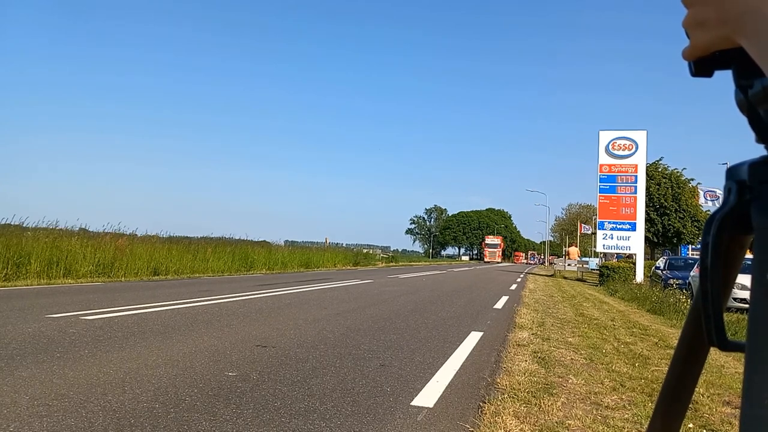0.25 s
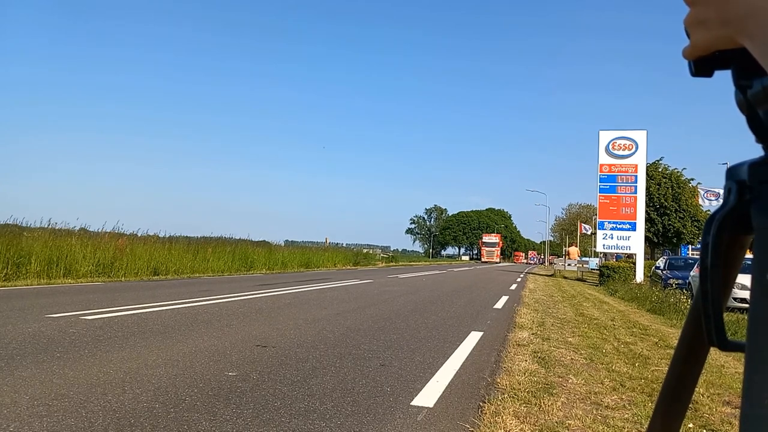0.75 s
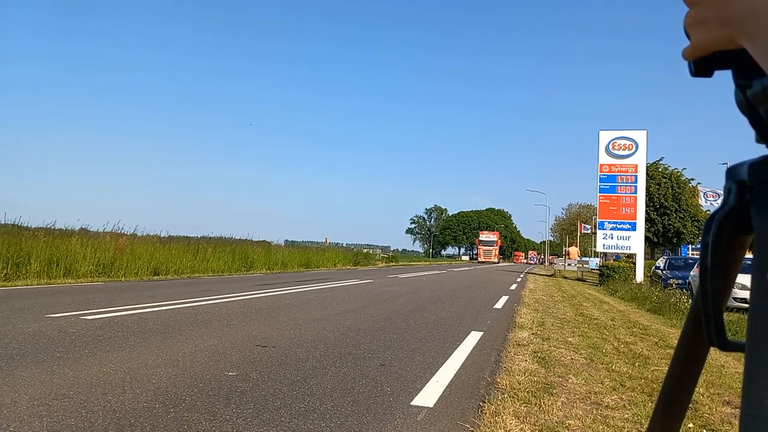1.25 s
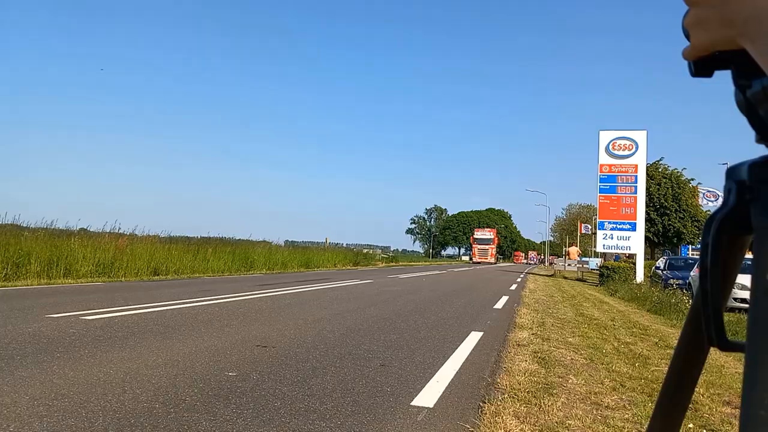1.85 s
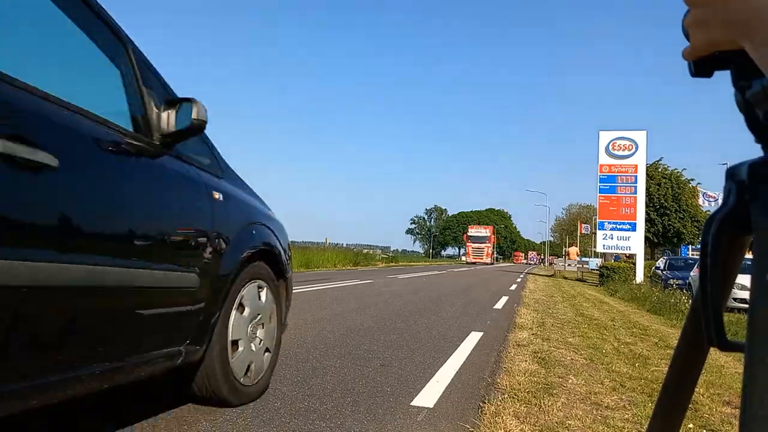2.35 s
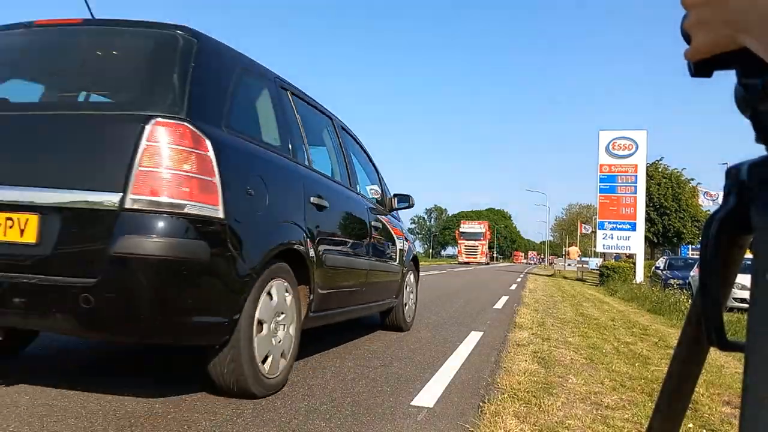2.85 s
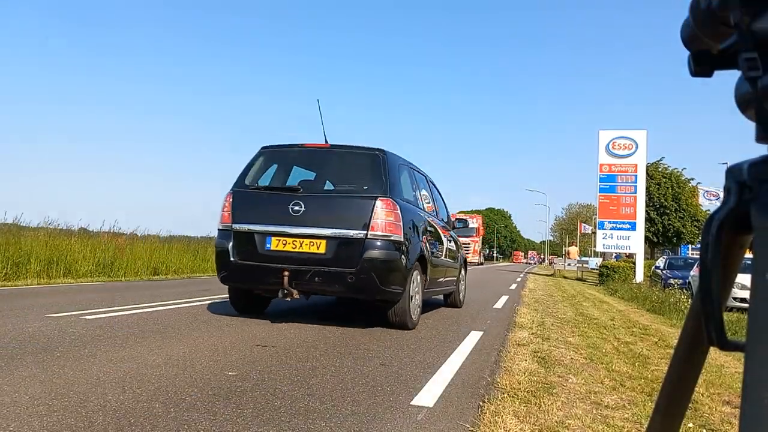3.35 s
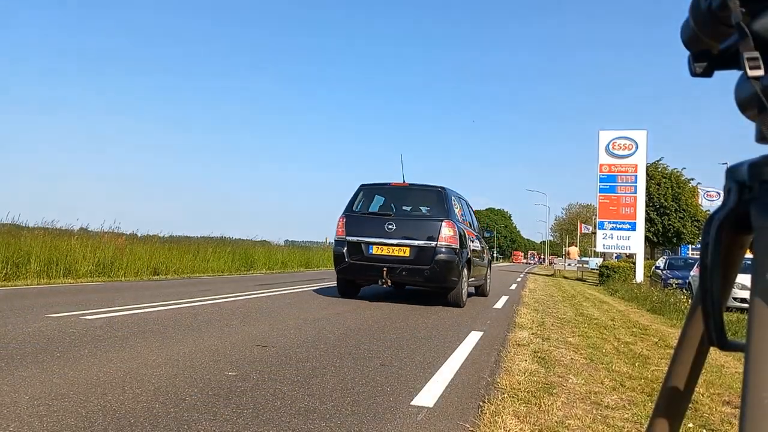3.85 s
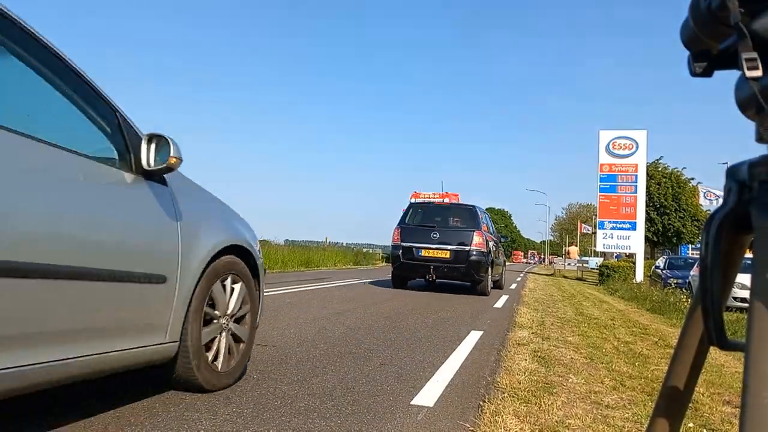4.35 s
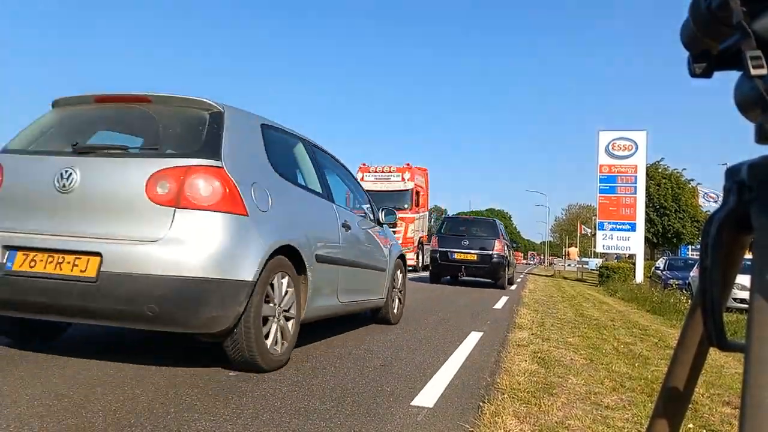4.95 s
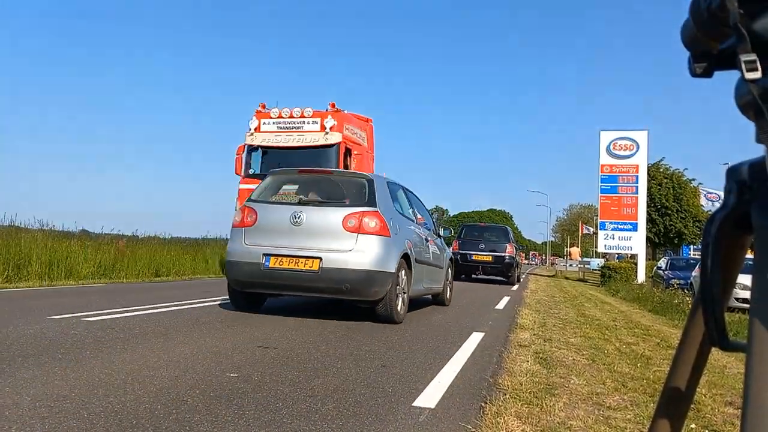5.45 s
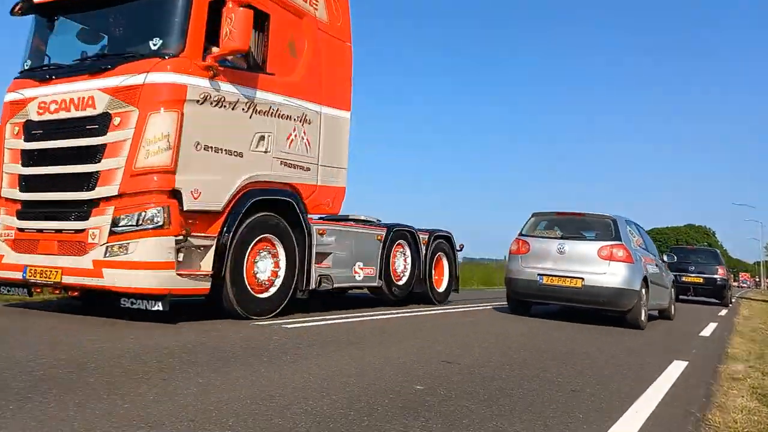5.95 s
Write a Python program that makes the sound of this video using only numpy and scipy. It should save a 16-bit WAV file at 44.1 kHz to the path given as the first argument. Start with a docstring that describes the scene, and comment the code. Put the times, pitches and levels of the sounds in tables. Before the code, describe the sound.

A truck's deep twin air horn blares from afar, cars brush past close, then it blips and blares again nearer before the diesel roars up.

```python
"""Twin air trumpets on an oncoming truck, from a country roadside: a long blast far off, a blip, a long blast nearer.
Each trumpet is a sum of harmonics, its pulses sliding through those of its twin; echoes and hiss are added.
Two cars roll past close by, in filtered noise and wavering tones; the later blast comes partly from behind them.
Then the truck's diesel (sine orders) and tyres (noise) swell as it draws level.
Gusts thump on the microphone ports, as short bursts of low noise over a faint breeze."""
import sys
import numpy as np
from scipy import signal
from scipy.fft import rfft, irfft
from scipy.io import wavfile
from scipy.ndimage import uniform_filter1d, map_coordinates

SR = 44100
rng = np.random.default_rng(int(sys.argv[2]) if len(sys.argv) > 2 else 0)


def to_wav(s):
    """Save 16-bit WAV."""
    ch = np.atleast_2d(s).T  # columns
    pcm = np.round(np.clip(ch, -1, 1) * 32767)  # PCM
    wavfile.write(sys.argv[1], SR, pcm.astype(np.int16))


N = 272920
TIME = np.arange(N) / SR
BINS = np.maximum(np.arange(N // 2 + 1) * SR / N, 1)   # Hz
CUTOFF_HZ = 15800   # top of the horn's harmonics and of the microphone channel
CLEARS_S = (4.056, 4.34)   # the truck comes out from behind the first car

# pulls on the horn valve, the second a mere blip: [opens t/s, shuts t/s, pitch f/Hz,
# trumpets in step t/s, punch level/dB before its share per band, bell note f/Hz, attack t/s]
BLASTS = [(-.1997, 1.056, 129.6, .245, 0, 830, .035), (3.5148, 3.563, 131, 3.63, 7, 790, .024),
          (3.6062, 4.583, 130.45, 3.685, 0, 730, .047)]
# horn colour from behind the first car: [f/Hz, relative level/dB]
HORN_SCREENED = [(130, 15), (260, 6.5), (390, 9), (520, -11), (650, -3.5), (790, -5), (1040, -3),
                 (1300, -3), (1650, -5.5), (2200, -5), (2800, -6), (3550, -7.5), (4100, -14.5),
                 (5800, -11.5), (7000, -15), (8800, -32), (15000, -39.5)]
# cars going by: [nearest t/s, rumble level/dB, roar level/dB]
CARS = [(2.7, -34, -33), (4.5, -45, -66)]
# colour of the cars' road noise: [f/Hz, relative level/dB per Hz]
CAR_COLOUR = [(30, -36), (55, -24), (70, -5.5), (135, -3), (185, -10), (235, -5.5), (310, -9.5),
              (420, -11.5), (600, -7), (850, -12), (1150, -12), (2100, -21.5), (3100, -28.5), (3900, -31),
              (7200, -35), (8400, -47.5), (13500, -43.5), (15500, -46)]


def horn():
    """The blasts, fraying in the air, glancing off the traffic and returning dully from trees and buildings."""
    blocks_s = (3.71, 3.89)   # the first car moves across the truck
    distant, *rest = [blast(*row) for row in BLASTS]
    close = sum(rest)
    direct = distant + close
    hiss = rasp(distant, above_hz=4200, blur_hz=300, level_db=-5.5)
    hiss = hiss + rasp(close, above_hz=3700, blur_hz=300, level_db=-9)
    near = glints(direct, above_hz=2600, latest_s=.0035, sway_s=.00004, sway_hz=2.5, level_db=-5.5)
    # while the first car stands in the way, the sound also bounces round it by longer paths
    blocked = fade(TIME, *blocks_s) * (1 - fade(TIME, *CLEARS_S))
    detour = glints(close * blocked, above_hz=1000, latest_s=.0075, sway_s=.00005, sway_hz=2, level_db=-5)
    # the shortest waves also scatter off the road and the verge
    shortest = irfft(rfft(close) * (1 - below(BINS, 8000) ** 2), N)
    sparkle = scatter(shortest, t60=.02, dull_hz=16000, level_db=-1)
    # long waves pass through the trees and short ones die in the leaves
    returned = signal.sosfilt(signal.butter(1, [420, 1100], "band", fs=SR, output="sos"), direct)
    echo = scatter(returned, t60=0.34, dull_hz=2110, level_db=-5.0)
    return direct + ring_out() + leak() + rush(direct) + hiss + near + detour + sparkle + echo


def blast(opens, shuts, pitch_hz, in_step_s, punch_db, bell_hz, attack_s, size=16):
    """Two reeds chop the air into pulses; the second runs slightly faster and slides through the first."""
    # horn paths far off, behind the first car, near: [second trumpet's treble level/dB, left lag t/ms]
    horn_paths = [(-19.5, 0.088), (-6, 0.074), (-15.5, 0.025)]
    release_s = 0.066   # the air pressure drains
    rise_hz_per_s, sag_hz = .55, 3.6   # pitch creeps up, and sags without pressure
    overshoot_hz, settle_s = 2, .04   # it starts sharp
    beat_hz = 1.64   # the second trumpet runs this much faster
    jitter, slack_jitter = 0.0012, 0.047   # cycles: at full pressure, and added as it drops

    on = (TIME >= opens) & (TIME <= shuts + release_s)
    t = TIME[on]
    # slack is 0 at full pressure, 1 at none
    slack = 1 - fade(t, opens, opens + attack_s) * fade(t, shuts + release_s, shuts)
    pitch = pitch_hz + rise_hz_per_s * (t - opens) - sag_hz * slack
    pitch = pitch + overshoot_hz * np.exp(-(t - opens) / settle_s)

    close, clear = int(opens > CARS[0][0]), fade(t, *CLEARS_S)
    path = np.array([(1 - close) * (1 - clear), close * (1 - clear), clear])
    second_db, lag_ms = np.transpose(horn_paths) @ path
    hz = np.arange(1, CUTOFF_HZ // pitch_hz)[:, None] * pitch.mean()
    # the second trumpet points away, which costs it more treble than bass
    weaker = from_db(second_db[::size] * (1 - 0.84 * below(hz, 1810, order=2)))
    # the weights move slowly, so one per block of samples will do
    weights = harmonic_weights(t[::size], slack[::size], punch_db, bell_hz, path[:, ::size], hz)
    weights = weights / np.sqrt(1 + weaker ** 2)

    sound = 0
    for offset, strengths in ((0, weights), (beat_hz * (t - in_step_s), weights * weaker)):
        wobble = (jitter + slack_jitter * slack) * drift(57)[on]
        cycle = np.exp(2j * np.pi * (np.cumsum(pitch) / SR + offset + wobble))
        harmonic = 1
        for strength in strengths:
            harmonic = harmonic * cycle   # next power: next harmonic
            sound = sound + (np.repeat(strength, size)[:len(t)] * harmonic).real
    out = np.zeros((2, N))
    late = map_coordinates(sound, [np.arange(len(t)) - lag_ms * SR / 1000], order=3)
    out[:, on] = from_db(0.92) * late, sound
    return out


def harmonic_weights(t, slack, punch_db, bell_hz, path, hz):
    """Strength of each harmonic: the colour of its path, the level of its band, softened as pressure drops."""
    # horn colour far off, then near: [f/Hz, relative level/dB]
    far_colour = [(130, 5), (260, 3.5), (390, 6), (520, -7), (780, -1.5), (910, 4.5), (1040, 3.5),
                  (1170, 3.5), (1430, -5), (1600, -2), (1800, -5.5), (1950, -14), (2300, -6.5), (2500, -15),
                  (3100, -3), (3300, -6.5), (3650, 2), (3850, -6), (4200, -23), (5600, -20.5), (7200, -28),
                  (8800, -44.5), (15000, -60)]
    near_colour = [(130, 8.5), (260, 0.5), (390, 0.5), (520, 0), (650, 5), (800, 4), (1100, 14.5),
                   (1550, 15), (1800, 10), (1960, 12.5), (2300, 3.5), (2600, 6.5), (2900, 2), (3350, 11.5),
                   (3700, 1.5), (4300, -15), (5100, -15), (5700, -10.5), (6400, -20), (7300, -16),
                   (8800, -33), (15000, -32)]
    # the horn as it arrives, before the lift: [t/s, blare level/dB, bite level/dB, sizzle level/dB]
    reach_far = [(0.03, -24, -31, -38.5), (0.182, -24, -32.5, -40.5), (0.55, -25, -31, -39.5),
                 (0.82, -25, -28.5, -40), (1.03, -25.5, -30.5, -36)]
    reach_close = [(3.68, -25, -22, -24.5), (3.878, -27.5, -26, -33), (4.012, -24.5, -27.5, -31.5),
                   (4.1, -24, -27.5, -27), (4.212, -20.5, -24.5, -34), (4.418, -25, -23.5, -24.5),
                   (4.494, -21.5, -27.5, -27.5), (4.58, -22, -19, -26.5)]
    # lift, a row for far and one for close: [blare level/dB, bite level/dB, sizzle level/dB]
    band_lift = [(-0.77, 2.5, 5.2), (0.39, 0.29, 2.6)]
    # share of a pull's punch: [bass, blare, bite, sizzle]
    punch_share = (0.14, 0.9, 0.57, 0.15)
    bass_db = (-30, -28.5)   # lowest harmonics, far and close
    # moving air makes blare, bite and sizzle flicker, but not the bass
    twinkle_db, twinkle_hz = (0, .3, .5, 1.7), 30
    # as the pressure drops the bell's note stands out and sinks, and the treble goes
    bell_fall_hz, bell_width_hz, bell_db, slack_dull_db = 256, 150, 12, 12

    colours = (far_colour, HORN_SCREENED, near_colour)
    weights = sum(pulse_shape(colour, hz) * share for colour, share in zip(colours, path))
    weights = weights * glides(t, hz)
    close = int(path[0, 0] == 0)
    reach = in_time((reach_far, reach_close)[close], t)
    levels = [bass_db[close]] + [db + lift for db, lift in zip(reach, band_lift[close])]
    # bands are levelled between edges and cross over between knees (Hz)
    edges, knees = (0, 600, 1900, 4100, SR), (450, 750, 1500, 2400, 3700, 4600)
    gain = 0
    for k, db in enumerate(levels):
        inside = (hz[:, 0] >= edges[k]) & (hz[:, 0] < edges[k + 1])
        band_rms = np.sqrt(np.sum(abs(weights[inside]) ** 2, axis=0) / 2)
        share = np.interp(hz, knees, (np.arange(len(knees)) + 1) // 2 == k)
        twinkle = twinkle_db[k] * np.interp(t, TIME, drift(twinkle_hz))
        gain = gain + share * from_db(db + twinkle + punch_db * punch_share[k]) / band_rms
    bell = np.exp(-((hz - bell_hz + bell_fall_hz * slack) / bell_width_hz) ** 2)
    bell = np.minimum(2 * slack, 1) * bell
    dulling_db = slack_dull_db * slack * np.log(1 + hz / 2000)
    return weights * gain * (1 - slack) * from_db(bell_db * bell - dulling_db)


def pulse_shape(colour, hz, spread_hz=1100):
    """Complex harmonic weights of a pulse with this colour: minimum phase, so all its ringing follows the front."""
    grid = np.linspace(1, SR / 2, 2049)
    cepstrum = irfft(np.log(from_db(at_hz(colour, grid))))
    cepstrum[len(grid):] = 0   # keep the causal half
    angle = np.interp(hz, grid, 2 * rfft(cepstrum).imag)
    angle += np.pi - 2 * np.arctan(hz / spread_hz)   # long waves leave the flare late
    return from_db(at_hz(colour, hz)) * np.exp(1j * angle)


def glides(t, hz):
    """Bands that ring out or cancel, sliding as the trumpets speak and the cars shift across the path."""
    # [from t/s, to t/s, from f/Hz, to f/Hz, width f/Hz, level/dB (negative cancels)]
    sliding_bands = [(3.534, 3.552, 1060, 1160, 170, 9), (3.61, 3.657, 760, 950, 220, 4),
                     (3.557, 3.98, 2440, 2100, 400, 6), (3.696, 3.97, 3580, 3670, 130, 8.5),
                     (3.713, 3.98, 3280, 2580, 350, -7.5), (4.113, 4.56, 1290, 1550, 275, 4),
                     (4.15, 4.58, 3140, 3400, 250, 0.5)]
    fade_s = 0.045
    response = 1
    for start, end, from_hz, to_hz, width_hz, db in sliding_bands:
        centre = from_hz + (to_hz - from_hz) * fade(t, start, end)
        present = fade(t, start - fade_s, start) * fade(t, end + fade_s, end)
        peak = 1 + (from_db(abs(db) * present) - 1) / (1 + 2j * (hz - centre) / width_hz)
        response = response * peak ** np.sign(db)
    return response


def ring_out():
    """Each time the valve shuts, the tubes ring on briefly with their own low notes."""
    # notes of the tubes: [f/Hz, level/dB far, level/dB close]
    tube_modes = [(520, -39, -26.5), (647, -24, -21.5), (769, -26, -26)]
    late_s, swell_s, t60_s = .012, 0.012, 0.16
    out = 0
    for opens, shuts, *_ in BLASTS:
        close = int(opens > CARS[0][0])
        t = np.maximum(TIME - shuts - late_s, 0)
        envelope = fade(t, 0, swell_s) * from_db(-60 * np.clip((t - swell_s) / t60_s, 0, 2))
        for hz, *db in tube_modes:
            out = out + from_db(db[close]) * envelope * np.sin(2 * np.pi * (hz * t + rng.random()))
    return out


def leak(stop_s=0.12):
    """Air hisses through the trumpets: it swells up to the start of the blip, then dies as the reeds catch."""
    peak_s, peak_db, rise_db_per_s, low_hz = 3.52, -31, 146, 1800
    air = irfft(stereo_noise(HORN_SCREENED, left_lead_ms=0.083) * (1 - below(BINS, low_hz) ** 2), N)
    swell = from_db(peak_db - rise_db_per_s * np.clip(peak_s - TIME, 0, 1))
    return swell * fade(TIME, peak_s + stop_s, peak_s) * rms_one(air)


def rush(x):
    """Air rushing through the reeds: noise that follows the strength of the horn in the right channel."""
    level_db, low_hz, top_hz = -11.5, 478, 17000   # level against the tone
    strength = np.sqrt(np.maximum(uniform_filter1d(x[1] ** 2, size=SR // 130), 0))
    band = below(BINS, top_hz) * (1 - below(BINS, low_hz) ** 2)
    air = irfft(stereo_noise(HORN_SCREENED, left_lead_ms=0.08) * band, N)
    return from_db(level_db) * strength * rms_one(air)


def rasp(x, above_hz, blur_hz, level_db):
    """Turbulent air frays the upper harmonics into hiss, differently in each channel."""
    bright = signal.sosfilt(signal.butter(4, above_hz, "high", fs=SR, output="sos"), x)
    eddies = rms_one(irfft(rfft(rng.standard_normal((2, N))) * below(BINS, blur_hz, order=2), N))
    return scatter(bright * eddies, t60=.012, dull_hz=12000, level_db=level_db)


def glints(x, above_hz, latest_s, sway_s, sway_hz, level_db, count=5):
    """Short reflections off moving car bodies: their paths keep changing, which blurs the upper partials."""
    bright = signal.sosfilt(signal.butter(1, above_hz, "high", fs=SR, output="sos"), x)
    out = np.zeros((2, N))
    for side in range(2):
        for k in range(count):
            path_s = latest_s * ((k + 1 + rng.random()) / (count + 1)) ** 2
            delay = path_s + sway_s * drift(sway_hz)
            out[side] += (-1) ** k * np.interp(TIME - delay, TIME, bright[side])
    return from_db(level_db) * out / np.sqrt(count)


def scatter(x, t60, dull_hz, level_db):
    """Many weak reflections, different in each channel, dying away; the level is before dulling."""
    tail = rng.standard_normal((2, N)) * from_db(-60 * np.minimum(TIME / t60, 5))
    tail /= np.sqrt(np.sum(tail ** 2, axis=1, keepdims=True))
    tail = irfft(rfft(tail) * below(BINS, dull_hz, order=1), N)[:, :SR]
    return from_db(level_db) * signal.fftconvolve(x, tail, axes=1)[:, :N]


def cars():
    """Two cars roll by on the left in road noise; the first hums, whines, flicks grit and squeals faintly."""
    # the cars' tyre hiss: [t/s, level/dB]
    tyre_hiss = [(1.15, -54), (1.7, -49), (2.3, -46.5), (2.9, -45.5), (3.2, -44.5), (3.45, -42.5),
                 (4.7, -51), (5, -53), (5.3, -59)]
    pass_s = 0.6   # distance from the lane over speed
    after_db_per_s = 1   # lift once a car has gone by, so it fades less than distance alone would make it
    power = 0
    for s, *levels in CARS:
        lift_db = after_db_per_s * np.maximum(TIME - s, 0)
        gains = np.array([from_db(db + lift_db) * passing(s, pass_s) for db in levels])
        power = power + gains ** 2
    gains = [*np.sqrt(power), from_db(in_time(tyre_hiss)[0])]
    tyres = road_noise(gains, CAR_COLOUR, left_lead_ms=0.29, flutter_db=3.5)
    # the first car's tailpipe points at the microphone
    exhaust = passing_tone(peak_s=3.35, width_s=0.089, peak_hz=140.6, fall_hz_per_s=16, level_db=-27.5,
                           waver=0.024, waver_hz=25.2, reach_s=0.32)
    # its tyres sing
    whine = passing_tone(peak_s=3, width_s=0.6, peak_hz=2620, fall_hz_per_s=90, level_db=-52,
                         waver=0.062, waver_hz=203, reach_s=0.41)
    return tyres + exhaust + squeal() + grit() + whine * from_db(4.5 * drift(28.0))


def passing_tone(peak_s, width_s, peak_hz, fall_hz_per_s, level_db, waver, waver_hz, reach_s):
    """An unsteady line that swells, fades and sinks in pitch as its car goes by."""
    hz = (peak_hz - fall_hz_per_s * (TIME - peak_s)) * (1 + waver * drift(waver_hz))
    gain = from_db(level_db) * passing(peak_s, width_s) * below(abs(TIME - peak_s), reach_s)
    return gain * np.sqrt(2) * np.sin(2 * np.pi * np.cumsum(hz) / SR)


def squeal(waver=0.0063, waver_hz=150, flicker_db=3):
    """A thin brake squeal, one wavering sine that sinks in pitch as the first car goes by."""
    # its course: [t/s, f/Hz, level/dB]
    squeal_line = [(.9, 6850, -90), (1.2, 6820, -69), (1.76, 6670, -53.5), (1.95, 6430, -60),
                   (2.26, 6370, -55), (2.6, 6280, -60), (3.3, 6200, -90)]
    hz, db = in_time(squeal_line)
    angle = 2 * np.pi * np.cumsum(hz * (1 + waver * drift(waver_hz))) / SR
    return from_db(db + flicker_db * drift(26)) * np.sqrt(2) * np.sin(angle)


def grit(decay_s=0.0038, low_hz=600, top_hz=2600):
    """The first car's tyres flick loose chippings: short dull ticks of decaying noise."""
    # each tick: [t/s, level/dB]
    chippings = [(2.036, -31), (2.254, -34), (2.402, -35), (2.612, -28), (2.879, -26), (3.096, -31)]
    envelope = 0
    for s, db in chippings:
        decay = np.exp(-np.clip((TIME - s) / decay_s, 0, 30))
        envelope = envelope + from_db(db) * (TIME >= s) * decay
    band = below(BINS, top_hz, order=2) * (1 - below(BINS, low_hz) ** 2)
    return envelope * rms_one(irfft(stereo_noise(CAR_COLOUR, left_lead_ms=0.32) * band, N))


def truck(rough=0.53, clatter=0.06):
    """Exhaust orders carry from afar; gear whine and tyre roar, throbbing with the firings, emerge later."""
    # colour of its road noise: [f/Hz, relative level/dB per Hz]
    truck_colour = [(18, -59), (30, -61), (58, -10), (88, 7.5), (126, 0), (180, -4), (219, -9), (256, -13),
                    (410, -27), (622, -19), (760, -23), (1050, -23.5), (2240, -32.5), (4200, -38.5),
                    (5200, -39), (7080, -43), (9190, -58), (12500, -52), (15500, -57)]
    # exhaust orders and gear whine, before distance and approach:
    # [multiple of the firing rate, level/dB, loss/dB behind the car (negative: louder there)]
    diesel_orders = [(1, -19.5, 8), (2, -41.5, -5.5), (3, -31, 7), (4, -32, -2), (5.33, -31, 21),
                     (7.29, -28, 16), (8.88, -36, 26), (10.27, -37, 14)]
    # [nearest t/s, then before distance and approach: rumble level/dB, roar level/dB, hiss level/dB]
    truck_pass = (6, -25, -20, -34.5)
    # the second car hides the truck until it emerges, costing rumble, roar and hiss this much
    emerges_s, screen_db = (5.56, 5.92), (11.5, 11, 13)
    tyre_pass_s, engine_pass_s = 0.31, 0.31   # distance over speed
    engine_late_s = 0.07   # the exhaust passes after the front wheels
    firing_hz, rev_hz_per_s = 84.7, 4.5   # as the truck draws level, and its acceleration

    nearest_s, *levels = truck_pass
    near, hidden = passing(nearest_s, tyre_pass_s), 1 - fade(TIME, *emerges_s)
    rate_hz = (firing_hz + rev_hz_per_s * (TIME - nearest_s)) * (1 + 0.0056 * drift(9.3))
    angle = 2 * np.pi * np.cumsum(rate_hz) / SR
    engine = 0
    for k, db, loss in diesel_orders:
        unsteady = 1 + rough * min(k / 2.5, 1) * drift(32)
        engine = engine + from_db(db - loss * hidden) * np.sqrt(2) * unsteady * np.sin(k * angle)
    gains = [from_db(db - loss * hidden) for db, loss in zip(levels, screen_db)]
    roar = road_noise(gains, truck_colour, left_lead_ms=0.028, flutter_db=2.5)
    approach = fade(TIME, 1.4, 6.9)   # still rising at the end
    exhaust = passing(nearest_s + engine_late_s, engine_pass_s) * engine
    return approach * (exhaust + near * roar * (1 + clatter * np.cos(angle)))


def gusts(width_s=0.007, low_hz=70, top_hz=160):
    """Eddies thump on the microphone ports: a few strong ones among lesser ones at random."""
    # the strongest: [t/s, peak level/dB before the 6 dB cut below]
    strong_gusts = [(1.8, -24), (2.084, -26), (2.321, -22), (2.395, -18), (2.53, -19), (2.58, -19),
                    (3.038, -12), (3.4, -16.5), (5.475, -14.5)]
    # lesser ones in the wake of the cars; levels before the same cut
    eddies_per_s, eddy_db, eddy_spread_db, span_s = 4, -23.5, 2.5, (0.74, 5.8)
    eddies = list(strong_gusts)
    for when, strength in rng.random((int(eddies_per_s * np.ptp(span_s)), 2)):
        db = eddy_db + eddy_spread_db * (2 * strength - 1)
        eddies.append((np.interp(when, (0, 1), span_s), db))
    power = 0
    for s, db in eddies:
        power = power + from_db(2 * db) * np.exp(-np.minimum(((TIME - s) / width_s) ** 2, 20))
    shared, left, right = rng.standard_normal((3, N))
    band = below(BINS, top_hz, order=3) * (1 - below(BINS, low_hz, order=2) ** 2)
    air = irfft(rfft(shared + 0.66 * np.array([left, right])) * band, N)
    return from_db(-6.0) * np.sqrt(power) * rms_one(air)


def breeze():
    """A light rumble of moving air on the microphone ports, different at each."""
    level_db, low_hz, top_hz = -41.5, 73, 98
    band = below(BINS, top_hz, order=3) * (1 - below(BINS, low_hz, order=2) ** 2)
    air = irfft(rfft(rng.standard_normal((2, N))) * band, N)
    return from_db(level_db + 1.4 * drift(13)) * rms_one(air)


def road_noise(gains, colour, left_lead_ms, flutter_db):
    """Body rumble, tread roar and hiss of vehicles; the lower the band, the more it flutters."""
    noise = stereo_noise(colour, left_lead_ms)
    low, high = below(BINS, 250) ** 2, 1 - below(BINS, 2000) ** 2
    out = 0
    for k, (band, gain) in enumerate(zip((low, 1 - low - high, high), gains)):
        pair = irfft(noise * band, N)
        flutter = from_db(flutter_db / 2 ** k * drift(26))
        out = out + pair / np.std(pair.mean(axis=0)) * gain * flutter
    return out


def stereo_noise(colour, left_lead_ms):
    """Spectrum of coloured noise, most alike left and right near 500 Hz and almost unrelated in the treble."""
    # [f/Hz, left-right correlation]
    likeness = [(35, 0.65), (100, 0.41), (500, 0.95), (1500, 0.33), (4000, 0.017), (12000, 0.06)]
    mid, side = rfft(rng.standard_normal((2, N)))
    alike = np.clip(at_hz(likeness, BINS), 0, .97)
    pair = np.sqrt(1 + alike) * mid + np.sqrt(1 - alike) * side * [[1], [-1]]
    pair[0] *= np.exp(2j * np.pi * BINS * left_lead_ms / 1000)   # reaches the left first
    return pair * from_db(at_hz(colour, BINS))


def passing(nearest_s, width_s):
    """Gain of a source moving along a straight road: one over its distance."""
    return 1 / np.sqrt(1 + ((TIME - nearest_s) / width_s) ** 2)


def drift(rate_hz):
    """Slow chance with spread 1, drawn at every 32nd sample."""
    coarse = TIME[::32]
    hz = np.fft.rfftfreq(len(coarse), coarse[1])
    slow = irfft(rfft(rng.standard_normal(len(coarse))) * below(hz, rate_hz, order=2), len(coarse))
    return np.interp(TIME, coarse, rms_one(slow))


def from_db(db):
    """Decibels to gain."""
    return 10 ** (np.asarray(db) / 20)


def rms_one(x):
    """Scale to unit power."""
    return x / np.sqrt(np.mean(x ** 2) + 1e-20)


def in_time(rows, t=TIME):
    """Each column of a curve, joined by straight lines."""
    s, *columns = np.transpose(rows)
    return [np.interp(t, s, c) for c in columns]


def at_hz(points, hz):
    """Read a spectrum on a log-frequency axis."""
    f, value = np.transpose(points)
    return np.interp(np.log(hz), np.log(f), value)


def fade(t, start, end):
    """A ramp from 0 at start to 1 at end; it falls in time if end comes first."""
    return np.clip((t - start) / (end - start), 0, 1)


def below(hz, edge_hz, order=4):
    """Gain of a smooth low-pass."""
    return 1 / np.sqrt(1 + (hz / edge_hz) ** (2 * order))


def scene():
    """Everything at the roadside."""
    return horn() + cars() + truck() + gusts() + breeze()


def record(dry):
    """The highest peaks are rounded and the top is cut."""
    ceiling = .93
    limited = dry / (1 + (dry / ceiling) ** 6) ** (1 / 6)
    return signal.sosfilt(signal.ellip(10, .1, 80, CUTOFF_HZ, fs=SR, output="sos"), limited)


dry = scene()
out = record(dry)
to_wav(out)
```